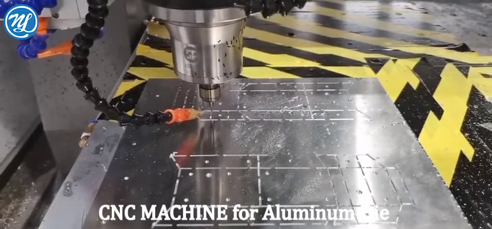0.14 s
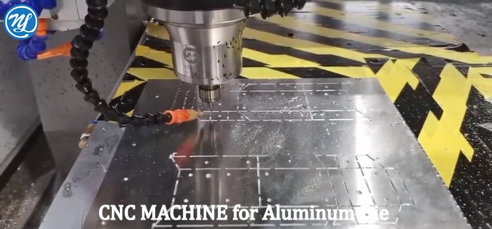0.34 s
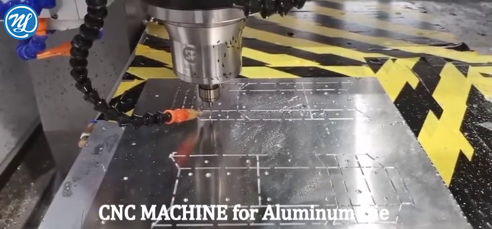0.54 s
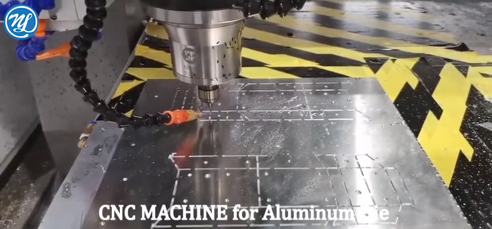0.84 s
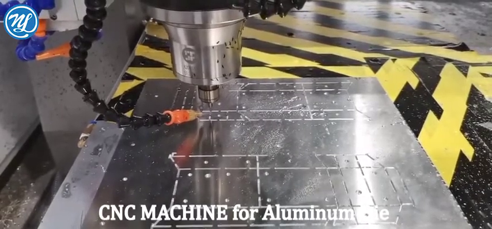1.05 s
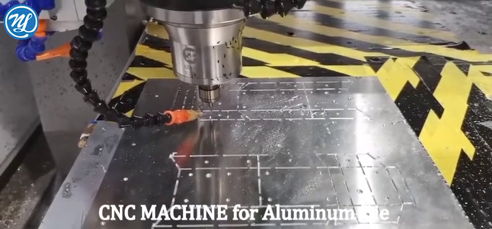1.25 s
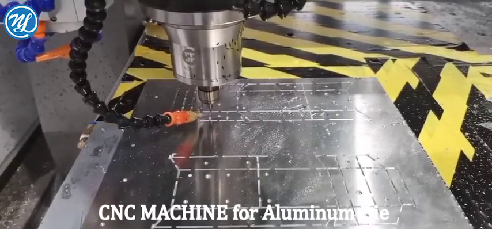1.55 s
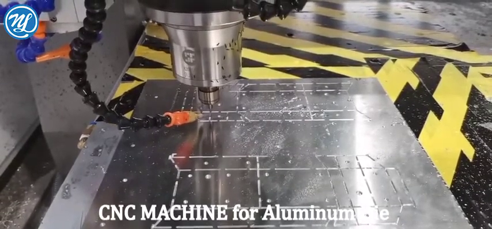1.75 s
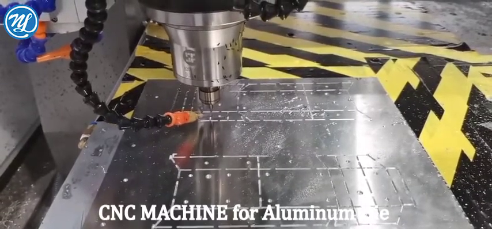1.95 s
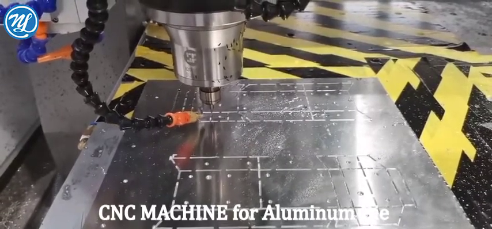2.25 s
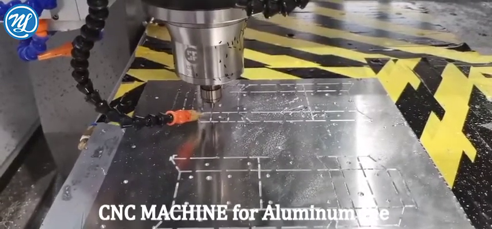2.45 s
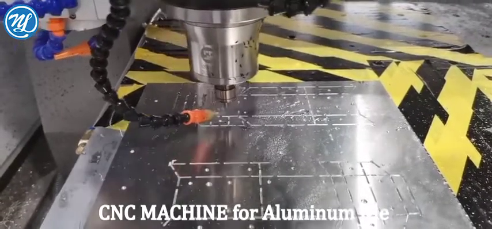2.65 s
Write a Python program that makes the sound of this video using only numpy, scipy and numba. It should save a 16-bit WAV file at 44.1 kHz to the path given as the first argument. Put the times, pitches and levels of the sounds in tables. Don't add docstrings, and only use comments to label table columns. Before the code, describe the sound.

Steady milling spindle whine with bright air hiss, then a brief axis-move whir and rumble

```python
import sys
import numpy as np
from scipy import signal
from scipy.io import wavfile
from scipy.ndimage import uniform_filter1d
from numba import njit

SR = 44100
rng = np.random.default_rng(int(sys.argv[2]) if len(sys.argv) > 2 else 0)


def invert_db(x):
    u = np.asarray(x, float) / 20
    return 10 ** u


def int16_out(signal):
    q = np.round(np.clip(np.atleast_2d(signal).T, -1, 1) * 32767)
    wavfile.write(sys.argv[1], SR, q.astype(np.int16))


N = 123921


def level(x, db):
    return x * invert_db(db) / np.sqrt(np.mean(x ** 2))


@njit
def resonator(x, hz, width):
    y, band_state, low_state = np.empty(len(x)), 0., 0.
    for i in range(len(x)):
        g = np.tan(np.pi * hz[i] / SR)
        damping = width / hz[i]
        v = (band_state + g * (x[i] - low_state)) / (1 + g * (g + damping))
        band_state = 2 * v - band_state
        low_state += 2 * g * v
        y[i] = damping * v
    return y


def band(hz, width):
    centre = hz * np.ones(N)
    once = resonator(rng.standard_normal(N), centre, 1. * width)
    return level(resonator(once, centre, 1. * width), 0)


def walk(rate):
    hold = int(SR / rate)
    steps = np.repeat(rng.standard_normal(N // hold + 1), hold)
    return 1.15 * uniform_filter1d(uniform_filter1d(steps, hold), hold)[:N]


def tone(phase, db):
    return np.sqrt(2) * invert_db(db) * np.sin(phase)


# t/s, level/dB
WHINE = [(0.03, -29), (0.13, -31), (0.27, -30), (0.38, -29.2), (0.52, -30), (1.0, -30.5), (1.52, -30.5),
         (1.6, -31.5), (1.68, -31), (1.88, -32.5), (1.96, -31.5), (2.12, -33.5), (2.18, -30.5),
         (2.28, -34.2), (2.36, -31.5), (2.52, -29.6), (2.595, -31.5), (2.65, -29.5), (2.81, -28)]
# t/s, second order level/dB, fourth order level/dB
EVEN_ORDERS = [(0.03, -63, -80), (0.08, -73, -67.5), (0.54, -52.5, -68), (0.69, -72, -73.5),
               (0.83, -59, -57), (1.03, -76, -66), (1.1, -56, -61), (1.4, -56, -57.5), (1.52, -50.5, -66),
               (1.56, -57, -55.5), (1.61, -58, -62.5), (1.88, -55, -61), (1.93, -60.5, -84),
               (2.08, -53, -52), (2.12, -57.5, -63), (2.2, -55, -59), (2.32, -61.5, -64), (2.78, -60, -61)]
OTHER_ORDERS_DB = [-71, -73, -81, -70]


def spindle(t):
    shaft_hz, wobble_rad, whine_wobble_db, order_wobble_db = 498.35, 0.0078, 0.38, 0.6
    turn = 2 * np.pi * shaft_hz * t + wobble_rad * walk(27)
    out = tone(turn + 1, np.interp(t, *np.array(WHINE).T) + whine_wobble_db * walk(24.9))
    times, second_db, fourth_db = np.array(EVEN_ORDERS).T
    for order, curve_db in ((2, second_db), (4, fourth_db)):
        db = np.interp(t, times, curve_db) + order_wobble_db * order * walk(25.66)
        out = out + tone(order * turn + order, db)
    for order, db in zip((3, 5, 6, 8), OTHER_ORDERS_DB):
        out = out + tone(order * turn + order, db + 4 * walk(3.64))
    return out


# t/s, lower hum level/dB, upper hum level/dB
PUMP = [(0.03, -52.5, -52), (0.3, -58.5, -55), (0.37, -59, -66.5), (0.49, -51, -70.5), (0.8, -60, -56.5),
        (1.09, -57, -55.5), (1.14, -67, -74), (1.19, -55, -60), (1.52, -65, -70), (1.61, -73.5, -53),
        (1.7, -58, -60.5), (1.89, -55.5, -55), (2.12, -66, -72), (2.16, -60, -69), (2.6, -60, -52.5),
        (2.78, -65, -65)]


def pumps(t):
    wander_rad, rough_db = 0.58, 2
    times, lower_db, upper_db = np.array(PUMP).T
    out = 0
    for hz, curve_db in ((139.6, lower_db), (222.8, upper_db)):
        db = np.interp(t, times, curve_db) + rough_db * walk(13.7)
        out = out + tone(2 * np.pi * hz * t + wander_rad * walk(8.9), db)
    return out


BEARING_HZ = 1940, 2714, 2215, 1691, 720, 3397, 4905, 7430, 9012
# bandwidth/Hz, level/dB
BEARING_TONES = [(6.1, -71), (9.9, -69), (5, -74), (6.6, -74), (4.8, -67), (70, -58.5), (110, -57),
                 (69.6, -52.5), (90, -50.5)]


def bearings():
    return sum(invert_db(db) * band(hz, width) for hz, (width, db) in zip(BEARING_HZ, BEARING_TONES))


# f/Hz, bandwidth/Hz, level/dB
PANELS = [(114, 12, -81), (153, 16.3, -68.5), (277, 76, -64.5), (448, 94, -59.5), (550, 56, -61),
          (939, 57, -65.5)]


def panels():
    return sum(invert_db(db) * band(hz, width) for hz, width, db in PANELS)


# t/s, level/dB
FLOW = [
    (0, 1),
    (.3, 0),
    (.55, 1),
    (.9, 0),
    (1.3, 0.5),
    (1.6, 0),
    (1.9, -.5),
    (2.2, -.5),
    (2.5, 0.5),
    (2.81, 0.5),
]


def air_flow(t, flicker_rate):
    return np.interp(t, *np.array(FLOW).T) + 0.52 * walk(flicker_rate)


# f/Hz, level/dB per Hz
AIR = [(25, -90), (110, -83.5), (260, -80), (380, -80.5), (1700, -86), (4500, -77.5), (10500, -81.5),
       (15000, -89)]


def broad_hiss(t):
    shape_hz, shape_db = np.array(AIR).T
    out = 0
    for hz in 25 * 2 ** (np.arange(29) / 3):
        density_db = np.interp(np.log(hz), np.log(shape_hz), shape_db)
        db = density_db + 10 * np.log10(hz)
        out = out + invert_db(db + air_flow(t, 9.54)) * band(hz, hz / 2.6)
    return level(out, -39.5)


# f/Hz, bandwidth/Hz, level/dB
JET = [(2385, 110, -73.5), (5060, 460, -59), (6670, 440, -49.5), (7190, 730, -45.5), (7840, 500, -47.5),
       (8620, 1150, -46), (9210, 550, -44), (9540, 400, -50.5), (10000, 70, -71.5)]


def jet(t):
    out = 0
    for hz, width, db in JET:
        drifting_hz = hz * (1 + 0.0022 * walk(3.0))
        out = out + invert_db(db + air_flow(t, 16)) * band(drifting_hz, width)
    return out


def enclosure(direct):
    t60_s, wall_db = 0.064, -18
    lag = np.arange(SR // 4) / SR
    walls = rng.standard_normal(len(lag)) * invert_db(-60 * lag / t60_s)
    walls = walls / np.sqrt(np.sum(walls ** 2))
    scattered = signal.fftconvolve(np.tile(direct, 2), walls)[N:2 * N]
    return (direct + invert_db(wall_db) * scattered) / np.sqrt(1 + invert_db(2 * wall_db))


# t/s, whir level/dB, whir f/Hz, rumble level/dB, cover level/dB
AXIS = [
    (2.28, -68, 600, -60, -70),
    (2.4, -60, 640, -51.5, -66),
    (2.47, -55, 684, -51, -55),
    (2.53, -53, 880, -50.5, -51),
    (2.6, -48, 900, -49, -54),
    (2.66, -53, 710, -52, -47),
    (2.71, -56, 690, -57, -55),
    (2.75, -50, 700, -47.5, -54),
    (2.81, -58, 695, -57, -39),
]


def axis(t):
    times, whir_db, whir_hz, rumble_db, cover_db = np.array(AXIS).T

    def gain(curve_db):
        return invert_db(np.interp(t, times, curve_db, left=-99) - 0.5 * walk(27.9))

    whir = gain(whir_db) * band(np.interp(t, times, whir_hz), 220)
    rumble = gain(rumble_db) * band(209, 320)
    cover = gain(cover_db) * band(593, 110)
    return whir + rumble + cover


def scene():
    t = np.arange(N) / SR
    machine = spindle(t) + pumps(t) + bearings() + panels()
    air = enclosure(broad_hiss(t) + jet(t))
    return (machine + air + axis(t))[None]


# f/Hz, share of time
MUTED = [(300, .02), (385, .6), (430, 0), (600, 0), (645, .3), (720, .02), (1650, .02), (1810, .25),
         (1950, .03), (2600, .12), (3200, .18), (3800, .02), (10500, .01), (12000, .1), (12900, .4),
         (13150, .15), (13600, .3), (14500, .2), (16000, .15)]
# t/s, length/s, lowest f/Hz
TOP_LOST = [(.05, .02, 14800), (.255, .025, 14400), (.6, .02, 14700), (.9, .04, 14800), (1.07, .025, 14400),
            (2.05, .04, 14900), (2.58, .04, 14500), (2.7, .03, 14600)]


def mute_weak_bands(x):
    hz, t, cells = signal.stft(x, SR, nperseg=2048, noverlap=1792)
    bins = np.arange(len(hz))
    row = np.where(hz < 11000, bins // 4, 400 + bins // 7)
    luck = uniform_filter1d(rng.standard_normal((600, len(t))), size=11, axis=1)[row]
    power = uniform_filter1d(abs(cells[0]) ** 2, size=30, axis=1)
    loud = np.log(uniform_filter1d(power, size=4, axis=0) + 1e-18)
    luck = luck + .15 * (loud - np.median(loud, axis=1)[:, None]) * (hz[:, None] < 1000)
    middle_hz = np.bincount(row, hz)[row] / np.bincount(row)[row]
    share = np.interp(middle_hz, *np.array(MUTED).T)
    mute = luck < np.quantile(luck, share)[:, None]
    for at, length, lowest_hz in TOP_LOST:
        mute = mute | (hz[:, None] > lowest_hz) & (abs(t - at) < length / 2 + .012)
    gated = cells * np.where(mute, invert_db(-32), 1)
    return signal.istft(gated, SR, nperseg=2048, noverlap=1792)[1][:, :N]


def roll_off(x):
    return signal.sosfilt(signal.butter(12, 16010, fs=SR, output="sos"), x)


def record(dry):
    top_cut = signal.ellip(12, .3, 70, 15130, fs=SR, output="sos")
    mix = mute_weak_bands(signal.sosfilt(top_cut, dry))
    return roll_off(mix)


dry = scene()
out = record(dry)
int16_out(out)
```